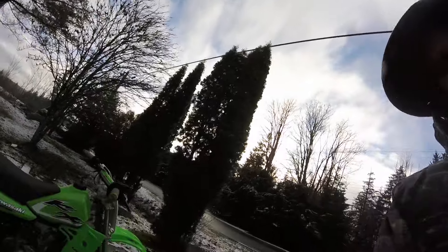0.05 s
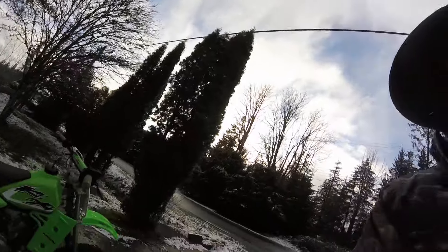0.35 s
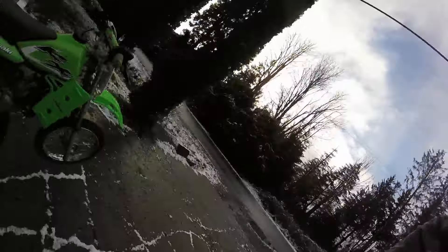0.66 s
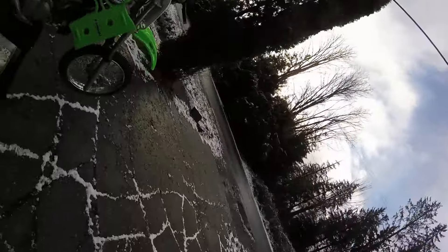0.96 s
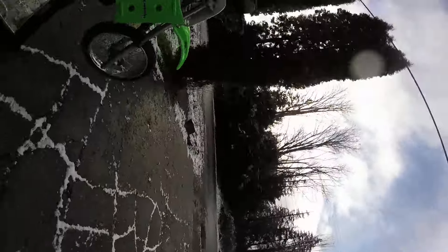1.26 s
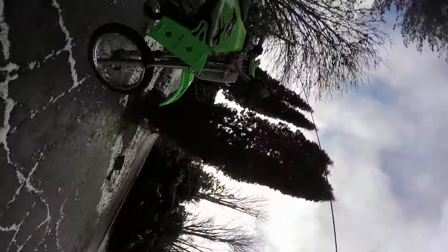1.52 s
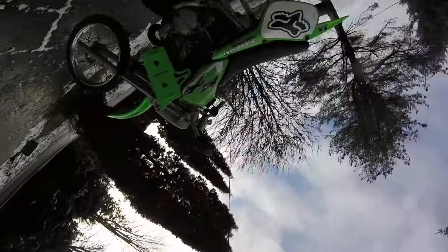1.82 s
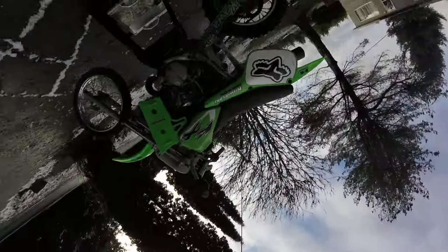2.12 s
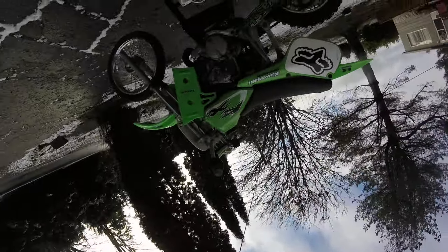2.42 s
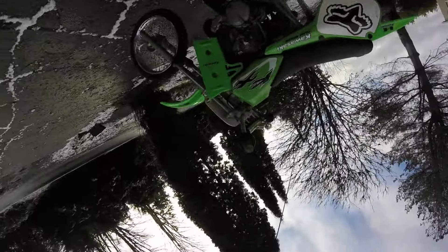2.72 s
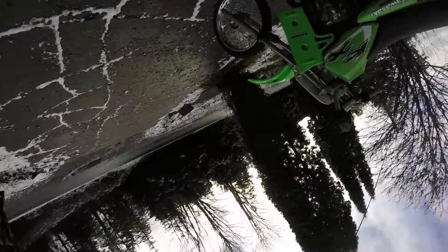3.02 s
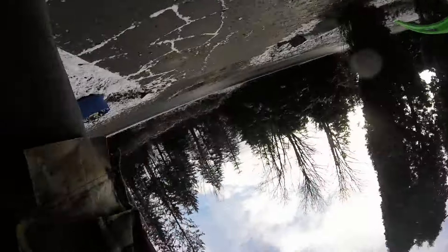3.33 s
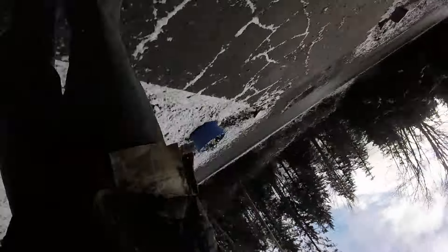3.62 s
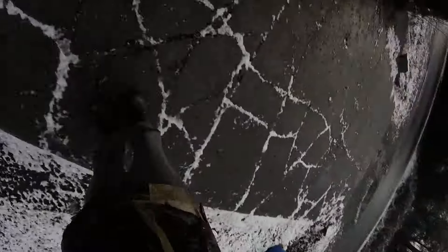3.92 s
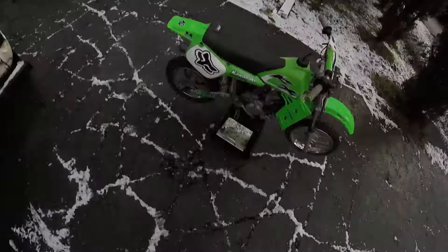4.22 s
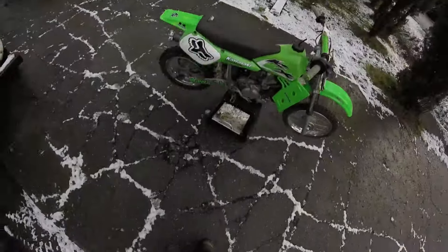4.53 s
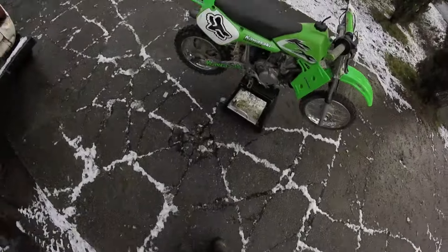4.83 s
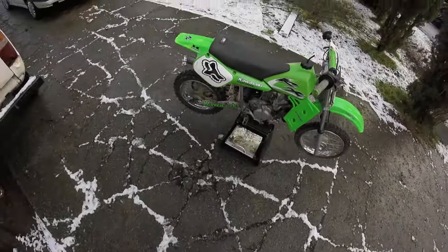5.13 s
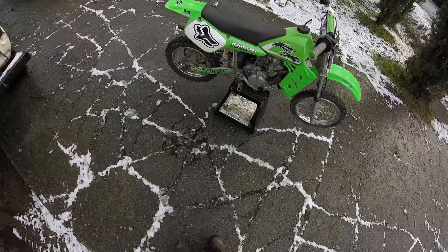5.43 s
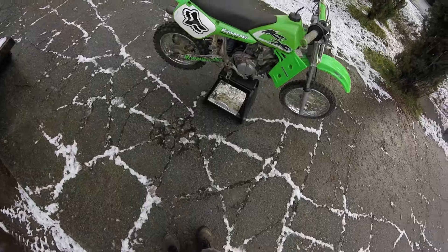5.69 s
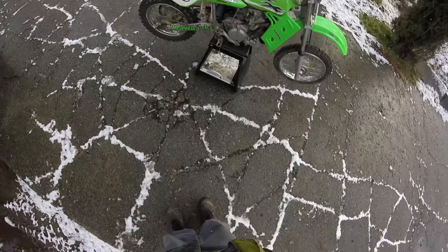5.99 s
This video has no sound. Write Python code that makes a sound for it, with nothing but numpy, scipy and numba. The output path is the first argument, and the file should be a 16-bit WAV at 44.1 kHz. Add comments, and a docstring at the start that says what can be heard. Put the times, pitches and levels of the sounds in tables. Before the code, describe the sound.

Clothing rubs and swishes against a body-worn camera outdoors, with a few sharp plastic clacks and a low handling rumble.

```python
"""A driveway, heard from a body-worn camera on someone bending over a parked dirt bike.
Right at the microphone, clothing folds, rubs and swishes against the plastic housing in short strokes;
the housing clacks in its mount and rings briefly. The swaying mount rumbles and thumps, with a dull
outdoor wash behind it. The camera's gain control ducks after the loud clacks."""
import sys
import numpy as np
from scipy import signal
from scipy.fft import rfft, irfft, next_fast_len
from scipy.io import wavfile
from scipy.ndimage import uniform_filter1d
from numba import njit

SR = 44100
rng = np.random.default_rng(int(sys.argv[2]) if len(sys.argv) > 2 else 0)


def inscribe(sig):
    """Save sig as 16-bit PCM at rate SR to the path in sys.argv[1].

    A 1-D sig is mono; a 2-D sig holds one channel per row.
    Samples are clipped to [-1, 1] before scaling.
    """
    pcm = np.round(np.clip(np.atleast_2d(sig).T, -1, 1) * 32767)
    wavfile.write(sys.argv[1], SR, pcm.astype(np.int16))


N = 271459

# spectrum of the outdoor wash: frequency_hz, density_db
AIR_SPECTRUM = [(100, -1), (200, -3.5), (400, -7), (800, -6), (1300, -14), (2100, -16), (3000, -24),
                (6000, -29), (10000, -33), (13500, -38.5), (15500, -41)]
# spectrum of the swaying mount's rumble: frequency_hz, density_db
SWAY_SPECTRUM = [(18, -5.5), (30, -4.5), (45, -8), (60, 4.5), (80, -6.5), (110, -9.5), (170, -21),
                 (300, -31.5)]
# soft bumps of the mount: start_s, peak_db, pitch_hz, t60_s
MOUNT_BUMPS = [(0.418, -32, 71, 0.32), (3.598, -19, 49, 0.21), (3.6, -30, 113, 0.036),
               (3.754, -32.5, 60.3, 0.43), (4.04, -23, 58.5, .25), (4.758, -27.5, 60, 0.33),
               (4.772, -27.5, 450, 0.057), (4.82, -31.5, 380, 0.047), (5.125, -33.5, 61, 0.28),
               (5.678, -37.5, 452, 0.046), (5.883, -32, 430, 0.034)]
# heavy folds pressing on the camera, a bigger fold buckling lower: start_s, length_s, level_db, pitch_hz
FOLD_STROKES = [(0.418, .06, -45, 549), (0.677, .12, -51.5, 725), (1.229, .16, -50, 398.7),
                (1.469, 0.19, -47, 604), (1.732, 0.16, -38.5, 680), (1.867, .04, -29, 680),
                (2.007, 0.047, -41.5, 702), (2.328, 0.081, -49, 716), (2.522, 0.046, -45.5, 553),
                (3.431, .18, -46.5, 595), (4.422, 0.096, -40, 450), (4.663, 0.26, -42, 367.6),
                (4.918, .23, -48, 390), (5.665, 0.37, -50.5, 440)]
# spectrum of crumpling thick cloth: frequency_hz, density_db
FOLD_SPECTRUM = [(130, -18), (250, 0), (420, 0), (520, -7), (740, 1.5), (900, -9.5), (1400, -23)]
# cloth dragged over the housing, levels before each layer's gain: start_s, length_s, scrape_db, hum_db
RUB_STROKES = [(0.418, 0.045, -51, -51), (0.646, .14, -47.5, -62), (0.822, .14, -58, -55),
               (1.013, 0.071, -47, -46), (1.151, 0.082, -55.5, -46.5), (1.474, 0.04, -48, -47.5),
               (1.525, 0.056, -46, -45.5), (1.623, 0.13, -46.5, -54), (1.741, 0.066, -34, -36.5),
               (2.004, 0.049, -39.5, -53), (2.138, 0.074, -46, -72), (2.371, 0.028, -43.5, -53),
               (2.534, 0.1, -53.5, -65), (3.433, 0.12, -51.5, -64), (3.561, 0.051, -49, -42),
               (3.97, 0.058, -45.5, -55.5), (4.428, 0.099, -41.5, -45.5), (4.68, 0.45, -51.5, -54),
               (4.89, 0.12, -52, -50), (5.615, 0.57, -53, -56.5)]
# spectrum of the air space inside the housing: frequency_hz, density_db
HOLLOW_SPECTRUM = [(700, -25), (850, -13.5), (925, -1), (1010, -2.5), (1120, -6), (1250, -18.5),
                   (1500, -20.5)]
# jacket fabric sliding on itself, higher when faster: start_s, length_s, level_db, centre_hz
SWISH_STROKES = [(.42, 0.034, -52.5, 2216), (.65, .14, -54, 2184), (1.025, 0.042, -50, 4470),
                 (1.148, 0.12, -58, 2780), (1.335, .06, -59.5, 6516), (1.485, 0.032, -49.5, 5890),
                 (1.53, 0.055, -57, 8650), (1.735, 0.091, -45, 6400), (1.868, 0.029, -30.5, 6400),
                 (1.975, 0.066, -51, 6400), (2.165, 0.054, -44, 6370), (2.302, 0.064, -50.5, 6310),
                 (2.54, .09, -63, 6510), (3.03, 0.26, -70.5, 8120), (3.555, .05, -48, 5300),
                 (3.708, 0.01, -55.5, 9510), (3.975, .055, -55.5, 8400), (5.06, .025, -65, 7000),
                 (5.687, 0.07, -52, 10940), (5.965, 0.047, -59, 5980)]
# spectrum of the sliding fabric's hiss: frequency_hz, density_db
SWISH_SPECTRUM = [(2000, 4), (3000, 4.5), (3900, 1.5), (5000, -1), (6450, -2.5), (7600, -4.5), (8500, -1.5),
                  (9700, -3), (11500, -6.5), (14000, -9), (15500, -14.5)]
# thin rings and a squeak of the mount: start_s, peak_db, pitch_hz, t60_s
MOUNT_RINGS = [(4.042, -42, 1847, .55), (4.041, 0, 2840, .024), (4.042, -50, 2790, .25),
               (4.257, -30, 1847, .14), (4.258, -13, 2600, .022), (4.526, -26, 2880, .017),
               (5.586, -40.5, 1745, .048)]
# resonances of the plastic housing: pitch_hz, relative_db, t60_s
HOUSING_MODES = [(325, -6.5, 0.023), (430, -6.5, 0.029), (620, -4.5, 0.025), (776.7, -5, 0.034),
                 (930, -5, 0.045), (1172, -7, 0.038), (1420, 0.5, 0.015), (1540, 0, 0.017),
                 (1915, -5, 0.016), (2237, -6.5, 0.015), (2590, -9, 0.011), (3010, -14.5, 0.018),
                 (3460, -8.5, 0.014), (4780, -7, 0.0056), (5280, -6.5, .005), (6400, -2.5, 0.0081),
                 (7480, -8, 0.0056), (8400, -5.5, 0.0081), (9550, -12.5, 0.0035), (11170, -15, 0.0091)]
# knocks and clicks on the housing: start_s, mid_db, bass_re_mid_db, treble_re_mid_db, resonance_hz
HOUSING_KNOCKS = [(1.214, -67, -9, 19, 1030), (1.259, -36, -14, -31, 940), (1.322, -43, 9, -18, 694),
                  (1.537, -40, -16, -22, 1390), (1.73, -30.5, -13.5, -5, 930),
                  (1.743, -31.5, -6.5, -28.5, 950), (1.7765, -12, -19, -25, 1390),
                  (1.7803, -4.5, -34, -13.5, 1470), (1.7832, -11, -16.5, -3, 1390),
                  (1.7929, -4.5, -12, -3.5, 1880), (1.7942, -3.5, -18.5, -5.5, 1540),
                  (1.8013, -10, -25.5, -7, 1480), (1.808, -16, -14.5, -15, 694),
                  (1.818, -19.5, -22.5, -17, 1560), (1.857, -33, -21.5, 1, 1440),
                  (1.8795, -21.5, -30, -8, 1420), (1.881, -14, -6, 2.5, 1400),
                  (1.888, -18.5, -22, -2.5, 1420), (1.9163, -25.5, -14, -1, 2220),
                  (1.966, -35, -7, -17.5, 766), (2.1346, -32, -10.5, -16, 878),
                  (2.165, -30, -14, -9.5, 750), (2.582, -36.5, -6, -14, 924), (3.347, -31, -14, -21, 784),
                  (3.481, -40.5, -0.5, -20, 767), (3.593, -37.5, -7, -9, 1100),
                  (3.811, -39, -5.5, -37, 780), (3.988, -39.5, 6.5, -25.5, 610),
                  (4.0116, -41.5, -26.5, -7.5, 1420), (4.021, -47, -10, -2, 1895),
                  (4.035, -26.5, -23.5, -17, 811), (4.04, 1, -21, -6.5, 886),
                  (4.052, -22.5, -16, -1.5, 943), (4.0606, -21.5, -9, -21.5, 930),
                  (4.257, -5, -28, -26, 932), (4.451, -35, -9, -22, 1970), (4.5252, -35.5, -28, -6.5, 2240),
                  (4.677, -37.5, -8.5, -30.5, 940), (4.738, -31, -15, -27.5, 997),
                  (4.785, -36.5, -25, -34, 990), (4.818, -34, -14, -25, 1030), (4.854, -40, -9, -37, 960),
                  (4.874, -38.5, -1.5, -30, 1040), (4.973, -37.5, 0.5, -18.5, 660),
                  (5.126, -46.5, 2, -36, 940), (5.827, -43, -3, -31, 996)]

MODE_HZ = np.array(HOUSING_MODES)[:, 0]
BASS_HZ, TREBLE_HZ = 650, 3300  # edges of the housing's middle band


def undb(db):
    """Decibels to gain."""
    return 10 ** (np.asarray(db) / 20)


def unit(x):
    """Scale to rms 1."""
    return x / np.sqrt(np.mean(x ** 2) + 1e-20)


def add(out, start_s, sound):
    """Mix a sound in at start_s."""
    i = int(start_s * SR)
    out[i:i + len(sound)] += sound[:N - i]


def near(hz, centre_hz, octaves):
    """A bell-shaped weight, 1 where hz meets the centre."""
    return np.exp(-.5 * (np.log2(hz / centre_hz) / octaves) ** 2)


def ring(hz, t60_s, t):
    """A damped sine."""
    return np.sin(2 * np.pi * hz * t) * np.exp(-np.log(1000) * t / t60_s)


def band(x, hz, kind):
    """Butterworth filter run both ways, so that all bands stay in step."""
    return signal.sosfiltfilt(signal.butter(3, hz, kind, fs=SR, output="sos"), x)


def colour(x, spectrum):
    """Shape x by a spectrum, falling away past both ends; rms 1."""
    hz, db = np.transpose(spectrum)
    size = next_fast_len(N, True)
    bin_hz = np.maximum(np.arange(size // 2 + 1) * SR / size, 1)
    roll_off = np.minimum(bin_hz / hz[0], 1) ** 2 * np.minimum(hz[-1] / bin_hz, 1) ** 2
    gain = undb(np.interp(np.log(bin_hz), np.log(hz), db))
    return unit(irfft(rfft(x, size) * roll_off * gain, size)[:N])


@njit
def moving_bandpass(x, hz, width):
    """State-variable band-pass whose centre moves every sample; width is relative to the centre."""
    out = np.empty(len(x))
    band_state, low_state = 0., 0.
    for i in range(len(x)):
        g = np.tan(np.pi * hz[i] / SR)
        passed = (band_state + g * (x[i] - low_state)) / (1 + g * (g + width))
        band_state = 2 * passed - band_state
        low_state += 2 * g * passed
        out[i] = width * passed
    return out


def glide(x, strokes, band_db, width):
    """Add a band of x that glides from each stroke's own frequency to the next; rms 1."""
    start_s, length_s, _, centre_hz = np.transpose(strokes)
    hz = np.interp(np.arange(N) / SR, start_s + length_s / 2, centre_hz)
    return unit(x + undb(band_db) * moving_bandpass(x, hz, width))


def flutter(rate_hz):
    """Smooth random wandering; rms 1."""
    hold = int(SR / rate_hz)
    steps = np.repeat(rng.standard_normal(N)[:N // hold + 1], hold)
    return unit(uniform_filter1d(steps, hold)[:N])


def slips(per_s, spread_db):
    """Threads catching and letting go: random tiny impulses of unequal size."""
    size = undb(spread_db * np.minimum(rng.exponential(size=N), 4))
    return (rng.random(N) < per_s / SR) * size * rng.choice([-1, 1], N)


def envelope(strokes, rest_db, attack_share=0.42, release_share=0.16, stir_db=1.5):
    """Gain of cloth that speeds up and slows down in each stroke, and never lies quite still."""
    t = np.arange(0, N / SR, .002)
    power = np.zeros(len(t))
    for start_s, length_s, level_db, *_ in strokes:
        progress = (t - start_s) / length_s
        ease_in = (1 + np.tanh(progress / attack_share)) / 2
        ease_out = (1 + np.tanh((1 - progress) / release_share)) / 2
        power += (undb(level_db) * ease_in * ease_out) ** 2
    stirring = undb(rest_db + stir_db * flutter(rate_hz=12))
    return np.hypot(np.interp(np.arange(N) / SR, t, np.sqrt(power)), stirring)


def fold_pressure():
    """How hard the heavy folds press on the camera."""
    return envelope(FOLD_STROKES, rest_db=-59)


def housing(weights, detune):
    """Impulse response of the plastic shell; the contact point weights its modes and bends them."""
    t = np.arange(SR // 12) / SR
    bends = 1 + detune * rng.standard_normal(len(HOUSING_MODES))
    return sum((-1) ** k * undb(db) * weights[k] * ring(hz * bends[k], t60_s, t)
               for k, (hz, db, t60_s) in enumerate(HOUSING_MODES))


def outdoor_air(level_db=-52):
    """A smooth, dull outdoor wash behind everything."""
    return colour(rng.standard_normal(N), AIR_SPECTRUM) * undb(level_db)


def mount_sway(rest_db=-49, push_db=1):
    """The camera wobbles on its springy mount, more when folds push it, and bumps against the body."""
    rumble = colour(rng.standard_normal(N), SWAY_SPECTRUM)
    out = rumble * np.hypot(undb(rest_db), undb(push_db) * fold_pressure())
    t = np.arange(SR // 2) / SR
    for start_s, peak_db, hz, t60_s in MOUNT_BUMPS:
        add(out, start_s, undb(peak_db) * ring(hz, t60_s, t))
    return out


def cloth_folds(flutter_db=4.5):
    """Thick cloth buckles against the camera with a coarse, muffled crumple."""
    force = slips(per_s=1000, spread_db=-0.5) * undb(flutter_db * flutter(rate_hz=30))
    crumple = colour(force, FOLD_SPECTRUM)
    return glide(crumple, FOLD_STROKES, band_db=2, width=.35) * fold_pressure()


def hollow_hum(gain_db=4):
    """Even rubbing keeps the air space around the microphone humming."""
    force = slips(per_s=5000, spread_db=1.5)
    hums = [(start_s, length_s, hum_db) for start_s, length_s, _, hum_db in RUB_STROKES]
    return colour(force, HOLLOW_SPECTRUM) * envelope(hums, rest_db=-67.5) * undb(gain_db)


def cloth_scrape(gain_db=1, flutter_db=2):
    """Gritty slips of the weave ring the housing; soft cloth excites mostly its middle modes."""
    force = slips(per_s=2000, spread_db=2.8) * undb(flutter_db * flutter(rate_hz=70))
    shell = housing(near(MODE_HZ, centre_hz=1810, octaves=0.82), detune=0)
    grit = band(signal.fftconvolve(force, shell)[:N], TREBLE_HZ, "low")
    return unit(grit) * envelope(RUB_STROKES, rest_db=-69.5) * undb(gain_db)


def jacket_swish(flutter_db=3.5, rasp_db=-11):
    """Fine slips of fabric on fabric hiss, higher in a faster slide, and ring the shell's top modes."""
    force = slips(per_s=9000, spread_db=2.2) * undb(flutter_db * flutter(rate_hz=90))
    shell = housing(MODE_HZ > TREBLE_HZ, detune=0)
    rasp = unit(signal.fftconvolve(force, shell)[:N])
    hiss = colour(force, SWISH_SPECTRUM) + undb(rasp_db) * rasp
    return glide(hiss, SWISH_STROKES, band_db=7, width=.3) * envelope(SWISH_STROKES, rest_db=-80)


def mount_rings():
    """Lightly damped modes of the mount sing on after a clack or a slip."""
    out = np.zeros(N)
    t = np.arange(SR // 2) / SR
    for start_s, peak_db, hz, t60_s in MOUNT_RINGS:
        add(out, start_s, undb(peak_db) * ring(hz, t60_s, t))
    return out


def housing_knocks(scuff=0.15, scuff_s=0.0008, crack=0.23, resonance_db=7, cushion_hz=2400):
    """Each blow on the housing is a sharp push and a scuff; its hardness sets the bass and treble."""
    out = np.zeros(N)
    lead = SR // 200  # room for the filters to spread ahead of the blow
    for start_s, mid_db, bass_db, treble_db, resonance_hz in HOUSING_KNOCKS:
        cushion_db = .4 * treble_db  # a blow cushioned by cloth hardly reaches the upper modes
        lift_db = resonance_db * near(MODE_HZ, resonance_hz, octaves=0.075)
        shell = housing(undb(lift_db + cushion_db * (MODE_HZ > cushion_hz)), detune=0.034)
        t = np.arange(len(shell)) / SR
        # the surfaces grind for a moment after they meet
        grit = band(rng.standard_normal(len(t)), TREBLE_HZ / 2, "high")
        force = (t == 0) + scuff * grit * t / scuff_s * np.exp(1 - t / scuff_s)
        ringing = signal.fftconvolve(force, shell)[:len(t)]
        blow = np.pad(ringing + crack * undb(cushion_db) * force, (lead, 0))
        parts = [(band(blow, BASS_HZ, "low"), bass_db),
                 (band(blow, [BASS_HZ, TREBLE_HZ], "band"), 0),
                 (band(blow, TREBLE_HZ, "high"), treble_db)]
        for part, part_db in parts:
            rms = np.sqrt(np.sum(part ** 2) / (.01 * SR))  # its energy spread over 10 ms
            add(out, start_s - lead / SR, undb(mid_db + part_db) * part / rms)
    return out


def gain_control(x, threshold_db=-20, depth_db=11.5, recover_db_per_s=21):
    """The camera turns down at once when the sound gets loud, then recovers at a steady rate."""
    power = uniform_filter1d(x ** 2, SR // 100)
    level_db = 10 * np.log10(np.maximum(power, 1e-12))
    excess_db = np.clip(level_db - threshold_db, 0, depth_db)
    recovery_db = recover_db_per_s * np.arange(N) / SR
    duck_db = np.maximum.accumulate(excess_db + recovery_db, axis=-1) - recovery_db
    return x * undb(-uniform_filter1d(duck_db, SR // 300))


def scene():
    """Everything reaches one microphone inside the housing."""
    clacks = housing_knocks() + mount_rings()
    clothing = cloth_scrape() + hollow_hum() + jacket_swish() + cloth_folds()
    return (clacks + clothing + mount_sway() + outdoor_air())[None]


def record(dry, muffle_hz=13200, cutoff_hz=15500):
    """The gain ducks, yet the hardest clacks overload; the highest treble is rounded off and cut."""
    clipped = np.clip(gain_control(dry), -1, 1)
    rounded = signal.sosfilt(signal.butter(3, muffle_hz, fs=SR, output="sos"), clipped)
    return signal.sosfilt(signal.ellip(8, .2, 70, cutoff_hz, fs=SR, output="sos"), rounded)


dry = scene()
out = record(dry)
inscribe(out)
```